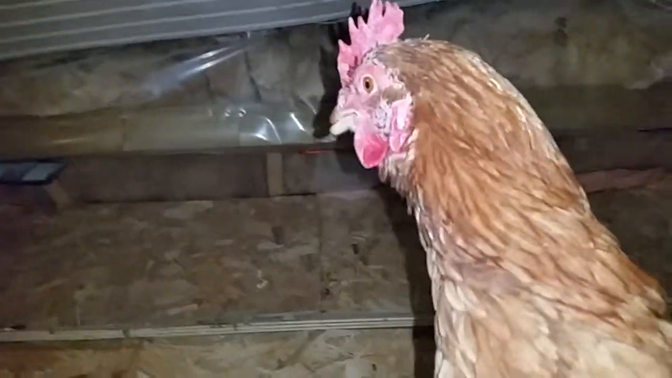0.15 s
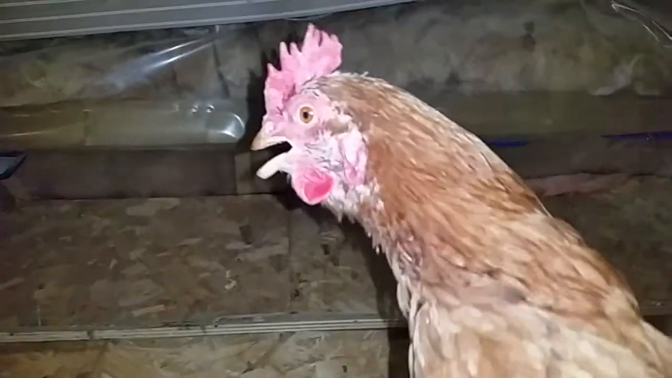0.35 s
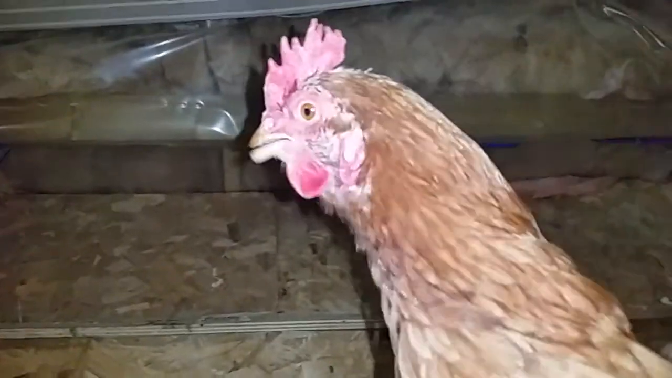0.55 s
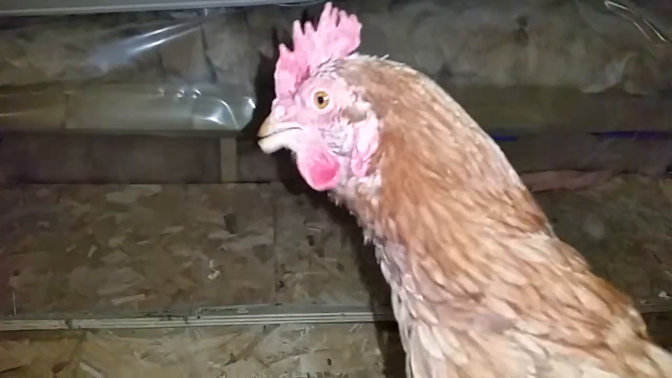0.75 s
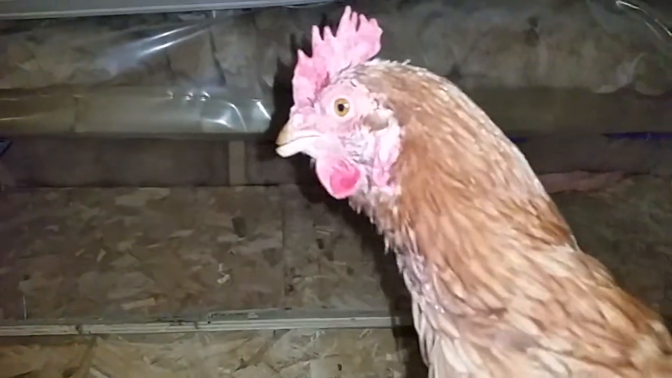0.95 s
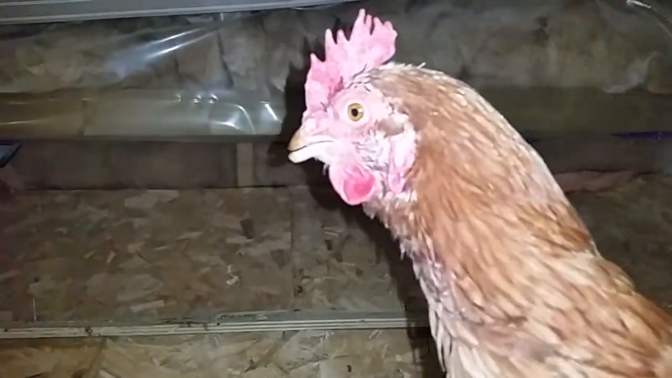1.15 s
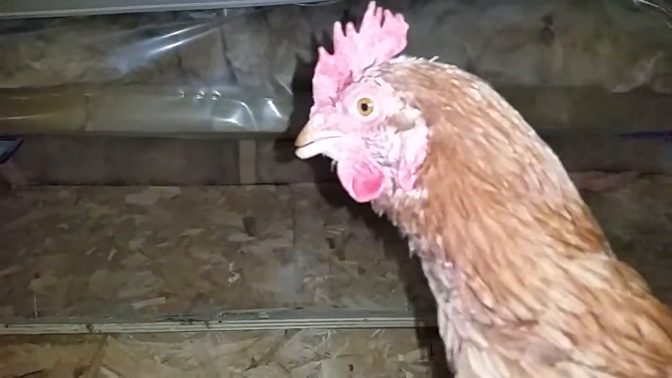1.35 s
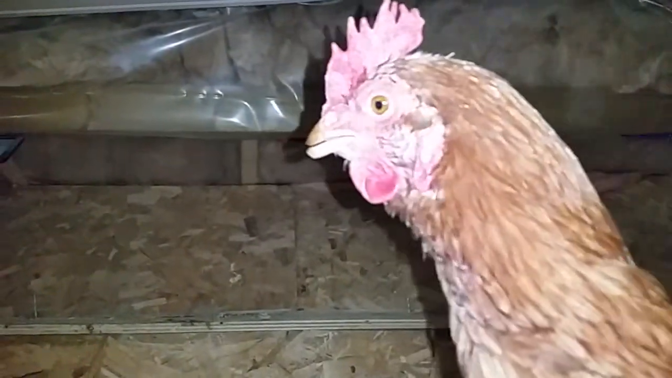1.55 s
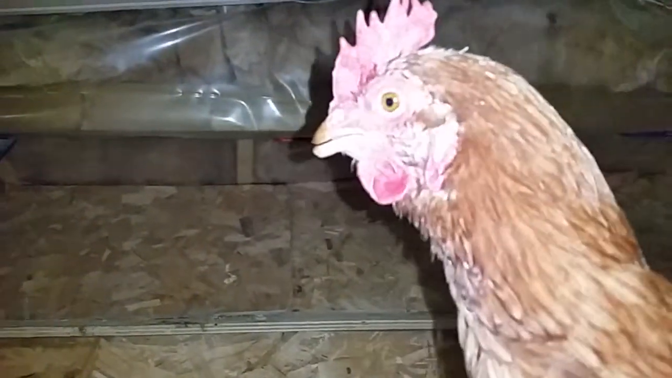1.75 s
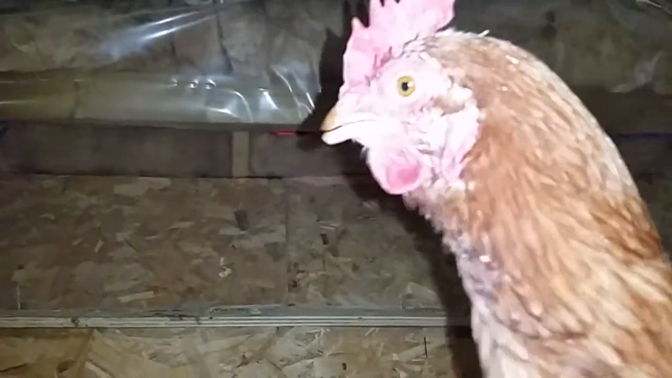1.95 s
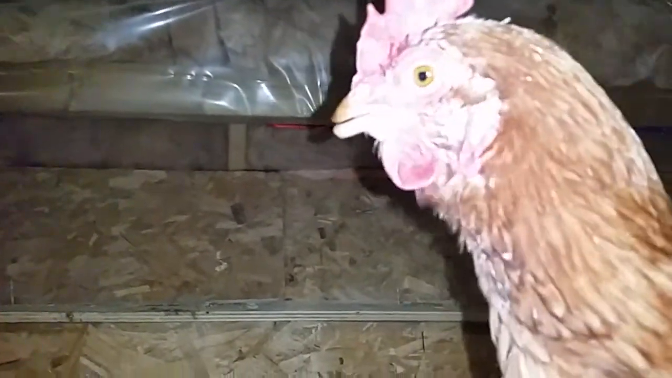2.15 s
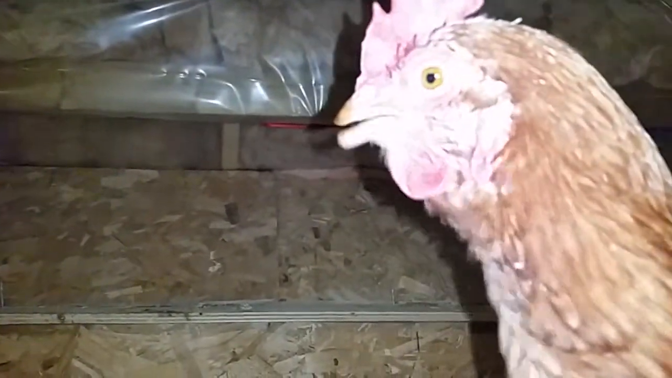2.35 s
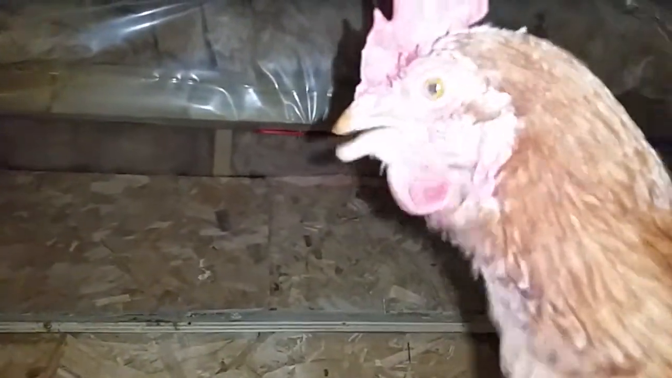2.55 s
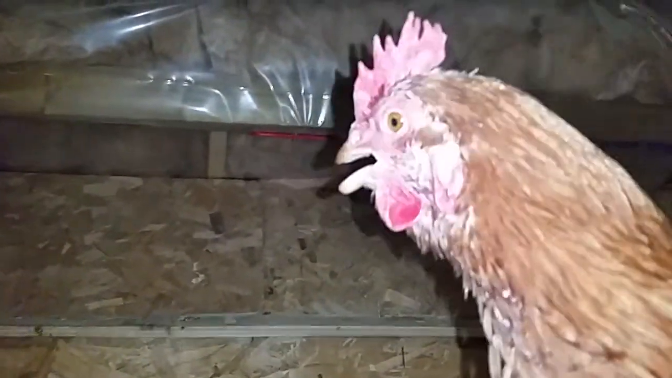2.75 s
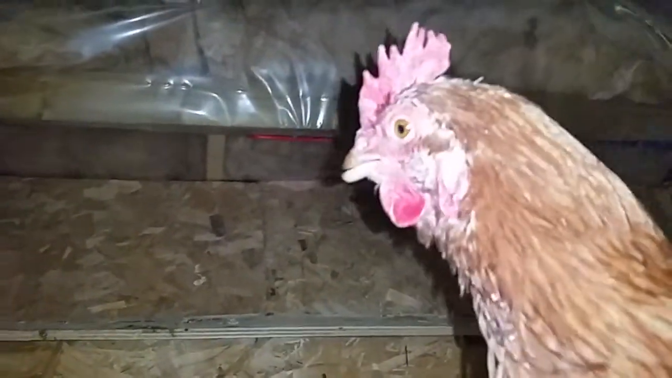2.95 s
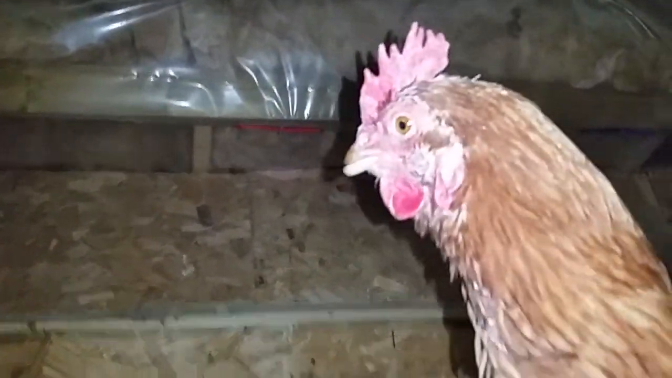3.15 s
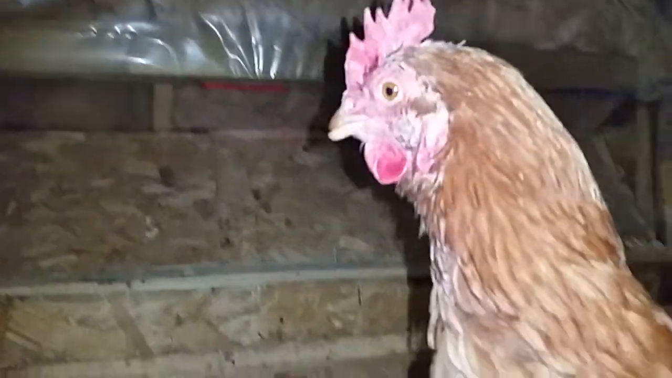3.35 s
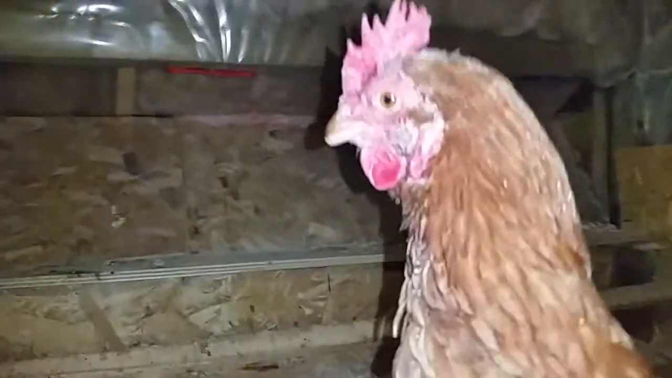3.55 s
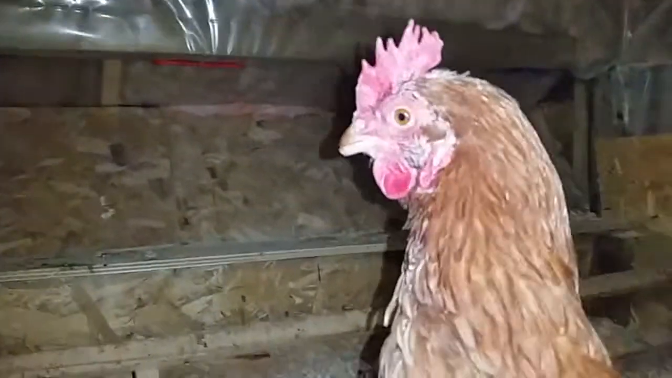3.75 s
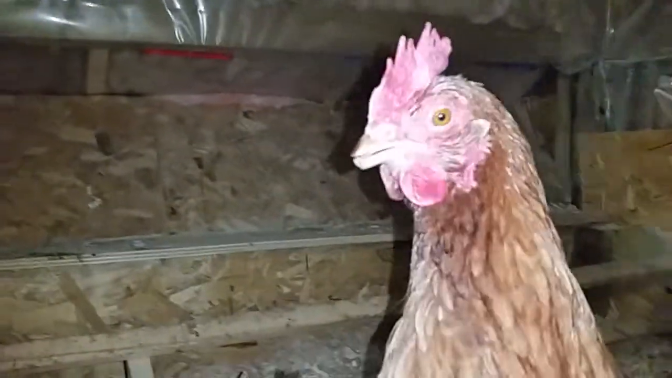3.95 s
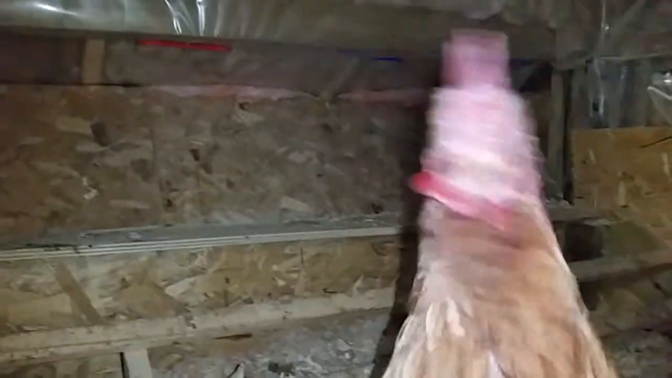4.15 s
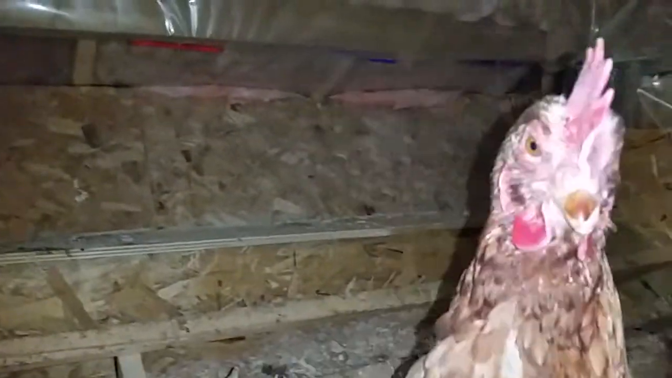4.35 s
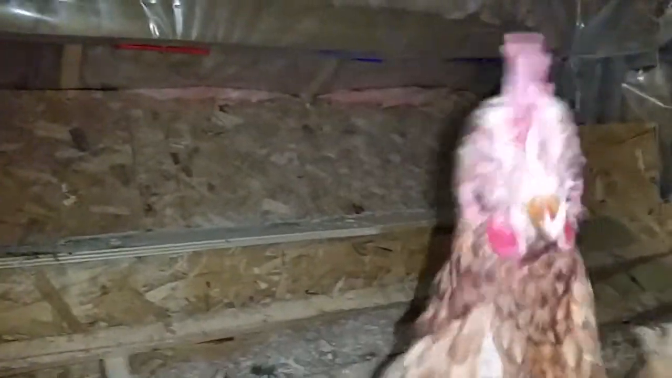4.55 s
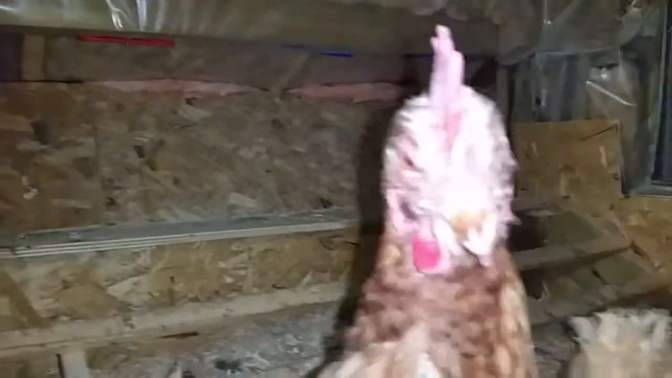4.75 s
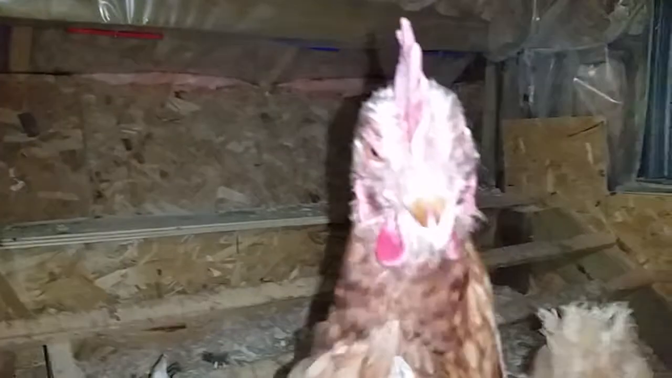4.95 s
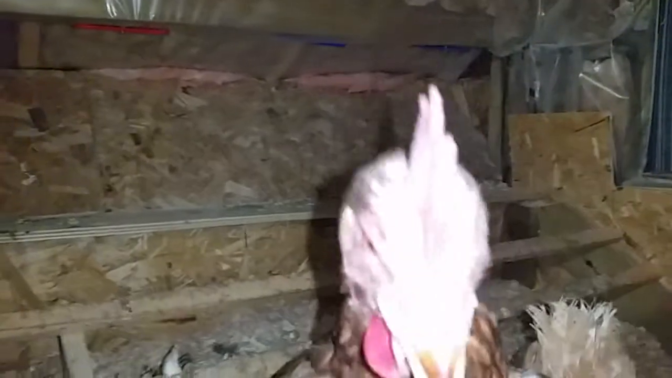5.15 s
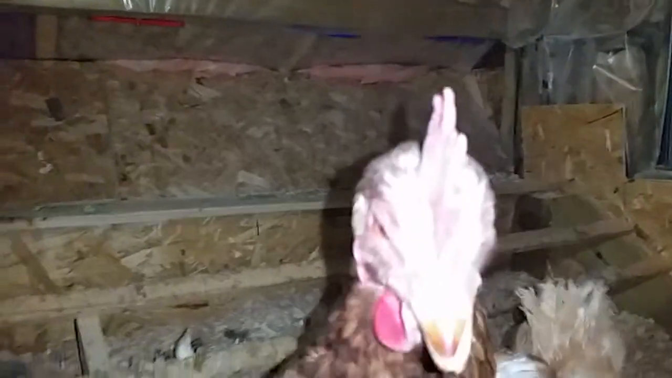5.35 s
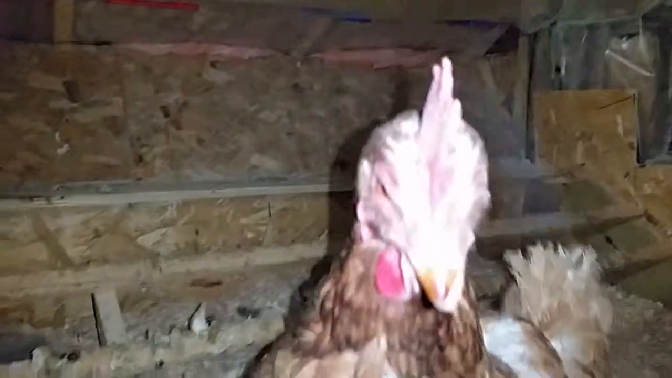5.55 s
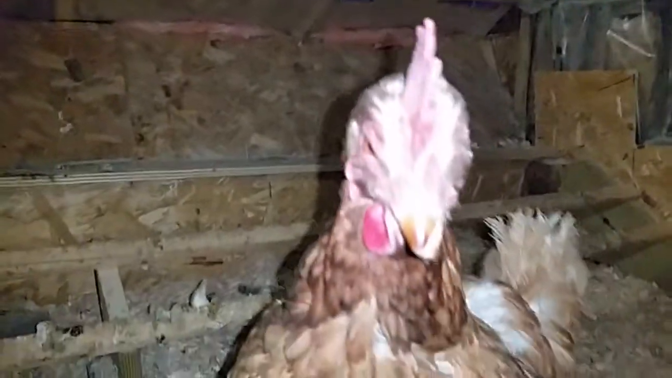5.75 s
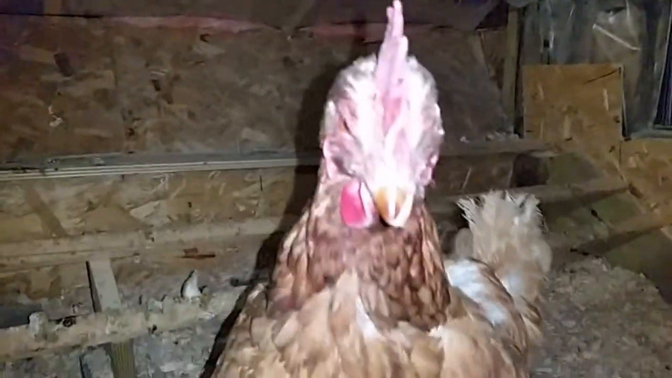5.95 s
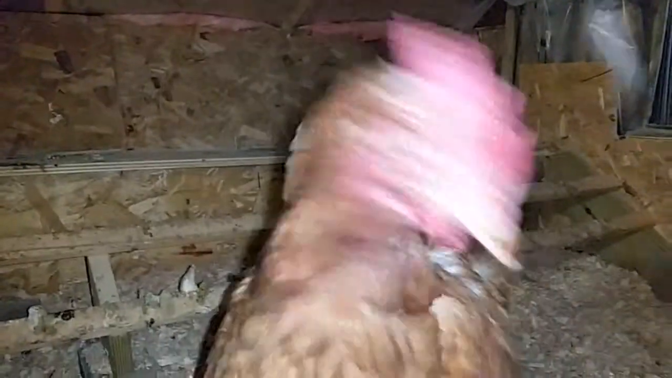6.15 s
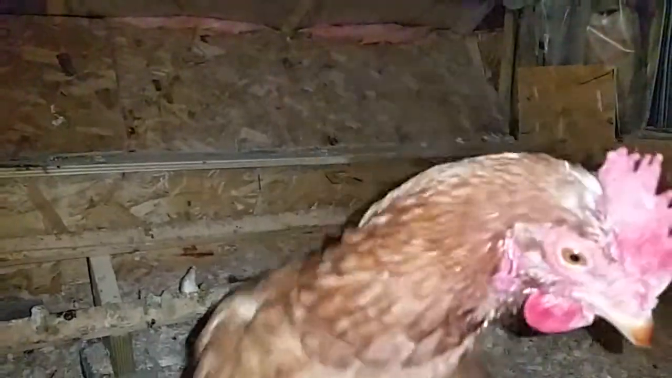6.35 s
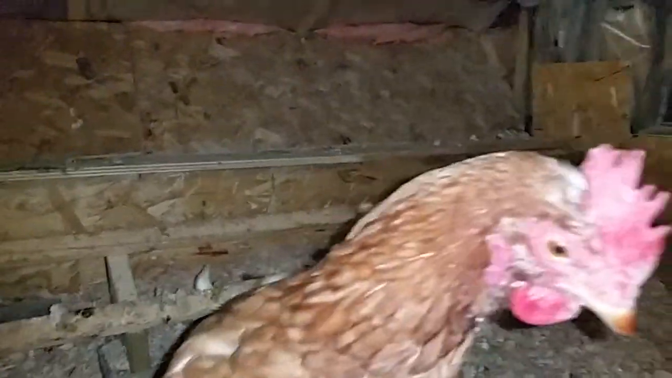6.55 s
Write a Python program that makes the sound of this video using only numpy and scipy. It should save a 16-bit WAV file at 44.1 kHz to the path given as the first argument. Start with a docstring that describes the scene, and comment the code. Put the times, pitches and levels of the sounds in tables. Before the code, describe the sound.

In a small plank-walled coop, a hen cackles very close to a phone. Quick, rough clucks come about four or five a second, and three times the voice leaps into a loud, clear, nasal squawk that breaks off hoarsely. After the last squawk and one more cluck she stops, leaving a faint wavering croon from another hen, slight rustling, a few foot ticks and a final small thud.

```python
"""Small wooden coop: a hen cackles close to a two-port phone, in runs of short rough clucks and three long clear squawks.
Her syrinx pulses ring the throat; the squawks are harmonic stacks. She first stands side-on, later faces the phone.
A second hen croons as a few wavering harmonics and clucks softly. Feet tick, thud and rustle in the litter.
Filtered noise makes a low rumble and faint hiss; noise tails make the plank walls' reverberation."""
import sys
import numpy as np
from scipy import signal
from scipy.fft import rfft, irfft
from scipy.io import wavfile
from scipy.ndimage import uniform_filter1d

SR = 44100
rng = np.random.default_rng(int(sys.argv[2]) if len(sys.argv) > 2 else 0)


def master(y):
    """Save y as 16-bit WAV."""
    cut = np.clip(np.atleast_2d(y).T, -1, 1)
    pcm = np.round(cut * 32767)  # scale
    wavfile.write(sys.argv[1], SR, pcm.astype(np.int16))


def volts_from_decibels(level):
    """Turn decibel levels (scalar or array-like) into linear amplitude factors."""
    exponent = np.asarray(level, float) / 20
    return 10 ** exponent


N = 294808

# clucks: start_s, length_s, top_pulse_hz, rel_level_db, hoarseness (0-1), rel_beak_treble_db
CLUCK_ROWS = [(-0.045, 0.057, 373.8, -19.5, .5, 11), (0.1655, .068, 387.9, -13.5, 0.4, 4),
              (0.6351, .067, 492.2, -13.5, 0.2, 9), (0.8429, .056, 413.6, -16, 0, 7),
              (1.0681, .057, 392, -17.5, .25, 5.5), (1.3004, .055, 381, -18, 0.3, 3),
              (1.5305, .056, 368.2, -17, 0.1, 5.5), (1.746, .057, 382, -16, .6, 4.5),
              (1.961, .056, 382, -15, 0.7, 3.5), (2.176, .063, 385, -15.5, 0.7, 4.5),
              (2.407, 0.061, 382, -14.5, 0.5, 3.5), (2.6229, .06, 397.7, -13.5, 0.5, 5.5),
              (3.1085, .068, 493.6, -13, 0.2, 8), (3.3331, .06, 398.2, -16, 0.2, 5.5),
              (3.9757, .041, 313.4, -25.5, .2, 7.5), (4.165, .044, 365, -17, 0.4, 6),
              (4.363, .047, 366, -15.5, 0.7, 6), (4.5643, 0.049, 361.4, -14.5, 0.5, 8),
              (4.7557, 0.052, 376, -14.5, 0.8, 4), (4.9661, .06, 401.4, -13.5, 0.4, 6),
              (5.4616, 0.055, 433.6, -14.5, 0, 8)]
# high break into each squawk: start_s, length_s, first_pulse_hz, held_pulse_hz, start_db, top_db
BREAK_IN_ROWS = [(.26, .021, 1010, 943, -36, -15.5), (2.729, .046, 850, 913, -16, -10),
                 (5.054, .023, 990, 880, -36.5, -13.5)]
# rough fall out of each squawk: start_s, length_s, rel_level_db, rel_beak_treble_db
BREAK_OUT_ROWS = [(0.494, 0.048, -6.5, 13.5), (2.965, .05, -6, 12.5), (5.281, .052, -6.5, 10.5)]
# course of that fall: share_of_length, pulse_hz, rel_level_db, roughness (0-1)
FALL_SHAPE = [(0, 555, -4.5, 0.3), (.16, 573, -1, 0), (0.349, 557, -10, 0.2), (.55, 467.7, -6, 0.3),
              (.8, 438, -9.5, 0.6), (1, 398, -21.5, .8)]
# second hen's soft clucks: start_s, length_s, top_pulse_hz, rel_level_db
SOFT_CLUCK_ROWS = [(6.372, 0.049, 431, -43.5), (6.52, 0.047, 438, -40.5)]
# throat resonance: freq_hz, gain_db
THROAT_GAIN = [(300, -35), (600, -1.5), (800, 0), (1000, 10), (1150, 2), (1300, -6), (1500, -15.5),
               (2200, -23), (5000, -49)]
# beak treble, hen side-on: freq_hz, left_db, right_db
BEAK_SIDE_ON = [(1470, -37, -16), (2376, -20.5, -30.5), (2750, -32.5, -25), (3090, -18.5, -25.5),
                (3680, -33, -43), (4470, -27, -33.5), (5260, -37.5, -42), (6110, -37, -57),
                (8420, -22, -34), (9740, -34, -50.5), (12300, -34.5, -31.5), (15100, -43, -38)]
# beak treble, hen facing the phone: freq_hz, left_db, right_db
BEAK_FACING = [(1470, -20, -30.5), (2037, -24.5, -13), (2530, -24, -28.5), (3140, -29, -20),
               (3500, -27.5, -28.5), (4435, -34, -43.5), (5470, -50, -75.5), (6140, -44, -29.5),
               (9000, -25, -43), (9200, -44.5, -36), (12160, -27, -22), (14060, -36, -35.5)]
# left port's phase lead over the right, hen side-on: freq_hz, lead_rad
PORT_LEAD = [(300, .3), (1100, .5), (1700, 1.6), (3300, 2.6), (6000, 2.3), (15000, 2.0)]
# one curve per held squawk: time_s, second_harmonic_hz, rel_level_db
SQUAWK_CURVES = [
    [(.279, 1033, -10), (.301, 1046, -15), (.331, 1085, -16.5), (.373, 1093, -14), (.44, 1098, -13.5),
     (.497, 1084, -14.5)],
    [(2.775, 1057, -9.5), (2.795, 1072, -15.5), (2.849, 1090, -13), (2.92, 1092, -13), (2.973, 1081, -12.5)],
    [(5.076, 1056, -9), (5.104, 1082, -14), (5.166, 1104, -12), (5.254, 1125, -12.5), (5.289, 1086, -11.5)],
]
# one list per squawk, harmonics 1, 2, ..: left_db, right_db
SQUAWK_HARMONICS = [
    [(-5, -9.5), (2, -3.5), (-9.5, -14), (-8.5, -36), (-19.5, -28), (-13.5, -14), (-41.5, -49),
     (-17.5, -26.5), (-48.5, -34), (-24.5, -23), (-23.5, -33.5), (-27.5, -31), (-17, -31), (-20.5, -42.5),
     (-15.5, -35.5), (-24, -54.5), (-40, -50), (-21.5, -28.5), (-33, -50), (-31, -34.5), (-28.5, -31),
     (-43, -23.5), (-39.5, -39), (-42, -33.5), (-39, -30), (-53.5, -37)],
    [(-7.5, -12.5), (1.5, 0.5), (-22.5, -22), (-12.5, -16), (-20, -37), (-19.5, -18), (-39, -53.5),
     (-19.5, -41), (-37.5, -26.5), (-28.5, -34), (-26.5, -32.5), (-25.5, -37), (-23.5, -31), (-21, -39.5),
     (-18, -41.5), (-27.5, -55), (-29.5, -45), (-32, -46.5), (-23.5, -27), (-29, -42.5), (-42, -38.5),
     (-34, -27), (-35, -33.5), (-28, -39), (-37.5, -36), (-58, -40)],
    [(-13, -13.5), (-2, 1), (-13.5, -10), (-13, -15.5), (-29, -22.5), (-14.5, -23.5), (-54, -41),
     (-21.5, -39.5), (-24, -36), (-20.5, -27.5), (-25.5, -25.5), (-27.5, -32), (-21.5, -31.5),
     (-21.5, -22.5), (-22, -39.5), (-20, -31), (-41.5, -50.5), (-26.5, -26), (-40.5, -25.5), (-30.5, -18),
     (-22, -17.5), (-29, -36), (-44.5, -45.5), (-49, -59), (-30, -36), (-35, -34.5)],
]
# second hen, one curve per croon: time_s, pitch_hz, rel_level_db
CROON_CURVES = [
    [(.088, 355.9, -49.5), (.112, 357, -53.5), (.158, 331.5, -42)],
    [(5.575, 266, -79), (5.613, 262, -52), (5.64, 264, -84)],
    [(5.69, 257, -68), (5.72, 253.1, -59), (5.75, 221.7, -61.5), (5.84, 228.6, -58.5), (5.93, 209.6, -69),
     (5.99, 224.1, -64.5), (6.06, 214, -64.5), (6.15, 204.6, -65.5), (6.2, 185.1, -62.5),
     (6.3, 202.4, -59.5), (6.36, 176.3, -59.5), (6.45, 190, -51.5), (6.54, 173.1, -52.5),
     (6.68, 186.7, -50)],
]
# closed-beak colouring: freq_hz, gain_db
CROON_MOUTH_GAIN = [(150, -31), (220, -3.5), (400, 8), (650, -9), (900, -10.5), (1100, -8), (1400, -95),
                    (2200, -28.5)]
# footsteps: time_s, rel_tick_db, rel_thud_db
STEP_ROWS = [(4.4728, -46, -58), (4.8769, -58, -41), (6.3764, -48.5, -67.5), (6.4388, -40, -69),
             (6.4864, -40.5, -27)]
# floor-board modes: freq_hz, rel_level_db, t60_s
BOARD_MODES = [(157.2, 0.5, 0.057), (290, -2, 0.0089), (624, -15, 0.04), (1055, -27, 0.012)]
# one curve per shavings rustle: time_s, level_db
RUSTLE_CURVES = [
    [(4.3, -69.5), (4.33, -52), (4.36, -62)],
    [(4.478, -66), (4.495, -54.5), (4.55, -71)],
    [(5.53, -64), (5.57, -54.5), (5.61, -76)],
    [(6.31, -84.5), (6.37, -74), (6.44, -66), (6.52, -71), (6.68, -68.5)],
]
# rustle colour: freq_hz, rel_level_db
RUSTLE_COLOUR = [(800, -7), (2000, -13), (4000, -3.5), (5800, -23), (8000, -9), (12000, -4), (14000, -10)]
# rumble: time_s, level_db
RUMBLE_CURVE = [(0.0, -52), (0.3, -68.5), (2.358, -58.5), (2.749, -64.5), (4.869, -54), (5.02, -63.5),
                (6.19, -73), (6.68, -53)]
# hiss: time_s, rel_level_db
HISS_CURVE = [(0, -68.5), (.91, -72), (2.488, -67), (3.499, -72), (3.749, -89), (3.92, -74), (4.299, -68.5),
              (4.65, -73), (5.45, -72.5), (5.75, -84), (6.1, -94), (6.68, -82)]
# colour of rumble and hiss: freq_hz, rel_density_db
AIR_COLOUR = [(15, -48.5), (25, -9), (59, -8.5), (128, -13.5), (154, -8), (196, -16.5), (301, -19),
              (335, -28.5), (1310, -50), (2930, -35), (6200, -52), (12100, -33), (15000, -44)]
# wall tails: t60_s, level_db, bass_db, treble_db
WALL_TAILS = [(0.087, -9.5, 0, 5.5), (.5, -41, -14.5, 8)]

TURN_S = 3.7  # side-on before, facing after
JITTER_CYCLES, SCATTER_DB = .07, 3.5  # pulse timing and size at roughness 1
JOIN_S = .005  # fade where breaks and squawks meet
# cluck: slow creak, catch part-way from slack to top rate, arch, settle at the rest rate
CREAK_S, CREAK_HZ, CREAK_DB, CREAK_ROUGH = .014, 213.6, -9.5, .18
SLACK_HZ, CATCH_SHARE, CATCH_DB, CATCH_ROUGH = 324.7, .6, -4, .72
FULL_AT, TOP_AT, HOLD_AT = .42, .62, .78  # shares of length
NEARLY = .98  # share of top rate at FULL_AT
TOP_DB, HOLD_DB, END_DB, REST_HZ, END_ROUGH = -1, -1.5, -13, 382, 1
SHORT_S, SHY_DB_PER_S = .044, 445.5  # shorter clucks start more softly
HALF_PER_HOARSE = .48  # strong-weak share of a fully hoarse cluck
TONE_SIDE_DB, TONE_FACING_DB = -7.5, -9  # clear fundamental
DROP_S, DROP_HZ, DROP_DB = .0063, 500, -.5  # the rate about halves at the end of a break-in
SOFT_EDGE_DB, SOFT_START_HZ, SOFT_END_HZ, SOFT_TOP_AT = -19.5, 306, 392, .5
CHEST_HZ, CHEST_WIDTH_HZ, TONE_POWER = 185, 120, 5
PUFF_FLOOR, BEAK_AJAR, BEAK_OPEN_S, EFFORT_POWER = .6, .15, .009, .45
FLUTTER = .0006  # rms share of squawk pitch
LOW_PASS_HZ = 14700


def shape(x, hz, db, lead=0.):
    """Causal minimum-phase colouring by (Hz, dB) points, plus a share of the port phase lead."""
    log_hz = np.log(np.maximum(np.fft.rfftfreq(4096, 1 / SR), 10))
    cepstrum = irfft(np.log(volts_from_decibels(np.interp(log_hz, np.log(hz), db))))
    cepstrum[1:2048] *= 2
    cepstrum[2049:] = 0
    gain = np.exp(rfft(cepstrum) + 1j * lead * port_lead(log_hz))
    # 256 samples of room for the phase lead
    return signal.oaconvolve(x, np.roll(irfft(gain), 256))[256:256 + len(x)]


def port_lead(log_hz):
    """Phase lead between the ports in radians."""
    hz, lead_rad = np.transpose(PORT_LEAD)
    return np.interp(log_hz, np.log(hz), lead_rad)


def ring(x, hz, width_hz):
    """Two-pole resonance, gain 1 at the centre."""
    return signal.lfilter(*signal.iirpeak(hz, hz / width_hz, SR), x)


def unit(x):
    """Scale to rms 1."""
    return x / np.sqrt(np.mean(x ** 2) + 1e-18)


def wander(size, window, passes=1):
    """Slow noise of rms 1: white noise under moving averages."""
    x = rng.standard_normal(size)
    for _ in range(passes):
        x = uniform_filter1d(x, window)
    return unit(x)


def lay(rows, fade_s):
    """Sample indices of a call, its columns per sample and a soft edge."""
    s, *columns = np.transpose(rows)
    i = np.arange(max(int(s[0] * SR), 0), min(int(s[-1] * SR), N))
    edge = np.clip(np.minimum(i - i[0], i[-1] - i) / (fade_s * SR), 0, 1)
    return i, [np.interp(i / SR, s, c) for c in columns], edge


def calls():
    """Each pulsed call: rows (s, Hz, dB, roughness), fundamental dB, beak dB, strong-weak share."""
    for s, length, hz, db, hoarse, beak_db in CLUCK_ROWS:
        shy_db = SHY_DB_PER_S * max(SHORT_S - length, 0)
        rows = [(s, CREAK_HZ, db + CREAK_DB - shy_db, CREAK_ROUGH),
                (s + CREAK_S, SLACK_HZ + CATCH_SHARE * (hz - SLACK_HZ), db + CATCH_DB, CATCH_ROUGH),
                (s + max(FULL_AT * length, CREAK_S + .0014), NEARLY * hz, db, hoarse),
                (s + TOP_AT * length, hz, db + TOP_DB, hoarse),
                (s + HOLD_AT * length, (hz + REST_HZ) / 2, db + HOLD_DB, hoarse + .13),
                (s + length, REST_HZ, db + END_DB, END_ROUGH)]
        tone_db = TONE_FACING_DB if s > TURN_S else TONE_SIDE_DB
        yield rows, tone_db, beak_db, HALF_PER_HOARSE * hoarse
    for s, length, start_hz, hz, start_db, db in BREAK_IN_ROWS:
        end = s + length
        rows = [(s, start_hz, start_db, .05), (end - 2 * DROP_S, hz, db - 4.5, .05),
                (end - DROP_S, hz, db, .3), (end, DROP_HZ, db + DROP_DB, .3)]
        yield rows, -3, 2.5, .1
    for s, length, db, beak_db in BREAK_OUT_ROWS:
        rows = [(s + at * length, hz, db + below_db, rough) for at, hz, below_db, rough in FALL_SHAPE]
        yield rows, -10, beak_db, .1
    for s, length, hz, db in SOFT_CLUCK_ROWS:
        rows = [(s, SOFT_START_HZ, db + SOFT_EDGE_DB, .28), (s + SOFT_TOP_AT * length, hz, db, .4),
                (s + length, SOFT_END_HZ, db + SOFT_EDGE_DB, .4)]
        yield rows, 3.1, -2.1, .13


def syrinx(hz, rough, share):
    """One pulse a cycle; roughness shifts and resizes it, every second one may be weak."""
    phase = np.cumsum(hz) / SR
    cycle = np.arange(int(phase[-1]) + 1)
    shift, scatter = rng.standard_normal((2, len(cycle)))
    at = np.interp(cycle, phase, np.arange(len(hz)))
    whole = at.astype(int)
    r = rough[whole]
    at = at + JITTER_CYCLES * r * shift * (cycle > 0) * SR / hz[whole]
    at = np.clip(at, 0, len(hz) - 2)
    size = volts_from_decibels(SCATTER_DB * r * scatter) * (1 - share * (cycle % 2))
    # split each pulse between its two nearest samples
    pulses = np.zeros(len(hz))
    np.add.at(pulses, at.astype(int), size * (1 - at % 1))
    np.add.at(pulses, at.astype(int) + 1, size * (at % 1))
    return volts_from_decibels(12) * pulses * np.sqrt(SR / hz), phase


def clucks():
    """Pulses ring throat and chest; the fundamental stays clear; treble and a puff of air leave the beak."""
    low, tone, beak = np.zeros(N), np.zeros(N), np.zeros((2, N))
    for rows, tone_db, beak_db, share in calls():
        i, (hz, db, rough), edge = lay(rows, .0058)
        pulses, phase = syrinx(hz, rough, share)
        if hz[0] > 500:
            # around a squawk the voice slides in instead of popping
            pulses = pulses * np.clip((i - i[0]) / (JOIN_S * SR), 0, 1)
        low[i] += pulses * volts_from_decibels(db)
        clear = np.clip(hz / 330, 0, 1) ** TONE_POWER
        tone[i] += edge * volts_from_decibels(db + tone_db) * clear * np.sin(2 * np.pi * phase)
        # the jet of air is broad, so each port hears partly its own hiss
        jet = rng.standard_normal((3, len(i)))
        puff = PUFF_FLOOR + np.exp(-(phase % 1) / .04)
        breath = volts_from_decibels(9.5) * (.45 + 1.3 * rough) * puff * (jet[0] + .95 * jet[1:])
        # treble grows faster than effort, and the beak takes a moment to open
        opening = np.clip(BEAK_AJAR + (i - i[0]) / (BEAK_OPEN_S * SR), 0, 1)
        opening = opening * volts_from_decibels(EFFORT_POWER * (db - db.max()))
        beak[:, i] += volts_from_decibels(db + beak_db - 2.5) * opening * (pulses + breath)
    chest = ring(ring(low, CHEST_HZ, CHEST_WIDTH_HZ), CHEST_HZ, CHEST_WIDTH_HZ)
    throat = shape(low, *np.transpose(THROAT_GAIN)) + tone + volts_from_decibels(-9.5) * chest
    facing = np.arange(N) > TURN_S * SR
    out = np.zeros((2, N))
    for port, side in enumerate((.5, -.5)):
        # facing the phone, her beak is nearly as far from both ports
        for gate, table, lead in ((~facing, BEAK_SIDE_ON, side), (facing, BEAK_FACING, .66 * side)):
            hz, *db = np.transpose(table)
            beak_hz = [1100, *hz, 14600, 15400]
            beak_db = [-50, *db[port], db[port][-1], -80]
            out[port] += shape(throat * gate, [300, 1200], [0, 0], lead)
            out[port] += volts_from_decibels(-2) * shape(beak[port] * gate, beak_hz, beak_db, lead)
    return out


def squawks(breath_db=-12):
    """A clear harmonic stack; slight flutter blurs the top harmonics and air hisses between them."""
    out = np.zeros((2, N))
    for rows, harmonics in zip(SQUAWK_CURVES, SQUAWK_HARMONICS):
        i, (second_hz, db), edge = lay(rows, JOIN_S)
        hz = uniform_filter1d(second_hz, 800) / 2
        phase = np.cumsum(hz * (1 + FLUTTER * wander(len(i), 300, 2))) / SR
        k = np.arange(1, len(harmonics) + 1)[:, None]
        start = 2 * np.pi * rng.random((len(harmonics), 1)) * (k > 2)
        lead = port_lead(np.log(k * hz.mean()))
        noise = signal.lfilter([.3], [1, -.96], rng.standard_normal((2, len(harmonics), len(i))))
        breath = volts_from_decibels(breath_db) * (k / 20) ** 1.2 * noise
        for port, side in enumerate((.5, -.5)):
            gain = volts_from_decibels(np.array(harmonics)[:, port:port + 1])
            lines = gain * (1 + breath[port]) * np.sin(2 * np.pi * k * phase + start + side * lead)
            out[port, i] = np.sqrt(2) * edge * volts_from_decibels(db) * lines.sum(axis=0)
    return out


def croons(waver_db=2.5, husk_db=-13):
    """Soft closed-beak notes: a few harmonics through a dull mouth, each wavering and a little husky."""
    out = np.zeros(N)
    mouth_hz, mouth_db = np.transpose(CROON_MOUTH_GAIN)
    k = np.arange(1, 10)[:, None]
    for rows in CROON_CURVES:
        i, (hz, db), edge = lay(rows, .0094)
        mouth = np.interp(np.log(k * hz), np.log(mouth_hz), mouth_db)
        waver = waver_db * wander((len(k), len(i)), 1200, 2)
        husk = 1 + volts_from_decibels(husk_db) * wander((len(k), len(i)), 250)
        lines = volts_from_decibels(mouth + waver) * husk * np.cos(2 * np.pi * k * np.cumsum(hz) / SR)
        out[i] += edge * volts_from_decibels(db) * lines.sum(axis=0)
    return out


def litter():
    """Each step is a dry tick and a thud in the floor boards; shavings rustle as dense grains."""
    out, t = np.zeros((2, N)), np.arange(int(.1 * SR)) / SR
    thud = np.zeros(len(t))
    for hz, db, t60 in BOARD_MODES:
        thud += volts_from_decibels(db) * np.sin(2 * np.pi * hz * t) * np.exp(-np.log(1000) * t / t60)
    for s, tick_db, thud_db in STEP_ROWS:
        tick = ring(rng.standard_normal((2, len(t))), 5000, 9000) * np.exp(-t / .001)
        start = int(s * SR)
        out[:, start:start + len(t)] += volts_from_decibels(tick_db) * tick + volts_from_decibels(thud_db + 2.5) * thud
    # faint shuffle throughout
    shuffle = ring(ring(rng.standard_normal((2, N)), 750, 1300), 750, 1300)
    out += volts_from_decibels(-62.5 + 1.2 * wander(N, 1500)) * shuffle
    grains = rng.standard_normal((2, N)) * volts_from_decibels(4.5 * rng.exponential(size=(2, N)))
    grains = unit(np.array([shape(side, *np.transpose(RUSTLE_COLOUR)) for side in grains]))
    for rows in RUSTLE_CURVES:
        i, (db,), edge = lay(rows, .008)
        out[:, i] += edge * volts_from_decibels(db) * grains[:, i]
    return out


def coop(x):
    """Plank walls return a short and a longer tail; thin planks let lows out, send treble back."""
    t, tail = np.arange(SR // 2) / SR, 0
    for t60, db, bass_db, treble_db in WALL_TAILS:
        common, own = rng.standard_normal(len(t)), rng.standard_normal((2, len(t)))
        fade = np.sqrt(2 * np.log(1000) / t60 / SR) * np.exp(-np.log(1000) * t / t60)
        onset = np.clip(t / .005, 0, 1)
        walls = volts_from_decibels(db) * (.8 * common + .6 * own) * fade * onset
        tail = tail + np.array([shape(side, [900, 2500], [bass_db, treble_db]) for side in walls])
    return signal.oaconvolve(x, tail, axes=1)[:, :N]


def air(flicker_db=3.5):
    """Rumble that swells and flickers, largely alike at both ports, under an unrelated hiss."""
    t = np.arange(N) / SR
    a, b, c = (shape(rng.standard_normal(N), *np.transpose(AIR_COLOUR)) for _ in range(3))
    low = signal.butter(1, 350, fs=SR, output="sos")
    bass = signal.sosfilt(low, [a + .5 * b, a + .5 * c])
    swell_db = np.interp(t, *np.transpose(RUMBLE_CURVE)) + flicker_db * wander(N, 2500)
    hiss = np.array([b, c]) - signal.sosfilt(low, [b, c])
    hiss_db = np.interp(t, *np.transpose(HISS_CURVE)) + 4.5
    return volts_from_decibels(swell_db) * unit(bass) + volts_from_decibels(hiss_db) * unit(hiss)


def scene():
    """Both hens and their feet in the coop; the phone's suppressor lowers the air under long loud calls."""
    near = clucks() + squawks() + croons() + litter()
    power = uniform_filter1d(near[0] ** 2, int(.12 * SR))
    return near + coop(near) + air() / (1 + (power / volts_from_decibels(-22)) ** 2)


def band_limit(x):
    """A steep low-pass at the top of the band."""
    return signal.sosfilt(signal.butter(12, 15820, fs=SR, output="sos"), x)


def record(dry):
    """The phone cuts the top with a steep elliptic low-pass."""
    low_pass = signal.ellip(8, .2, 60, LOW_PASS_HZ, fs=SR, output="sos")
    mix = signal.sosfilt(low_pass, dry)
    return band_limit(mix)


dry = scene()
out = record(dry)
master(out)
```